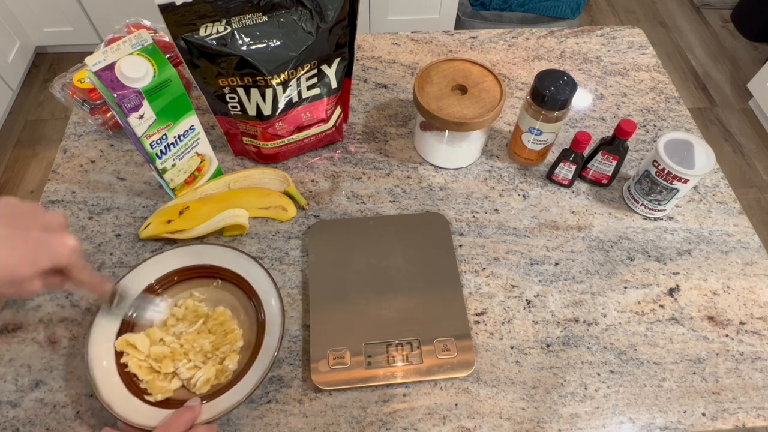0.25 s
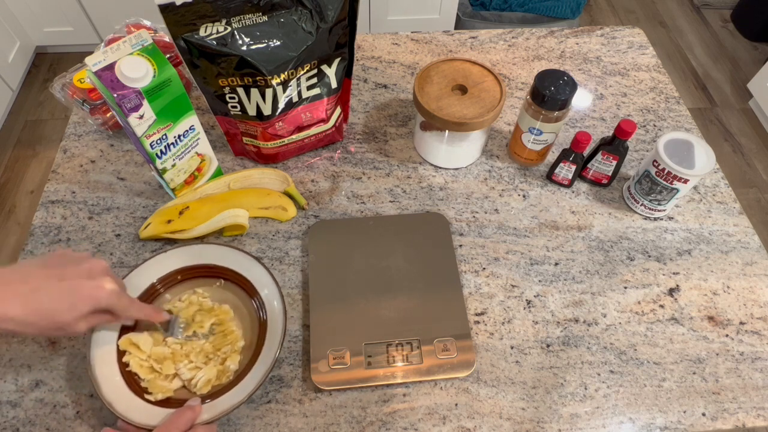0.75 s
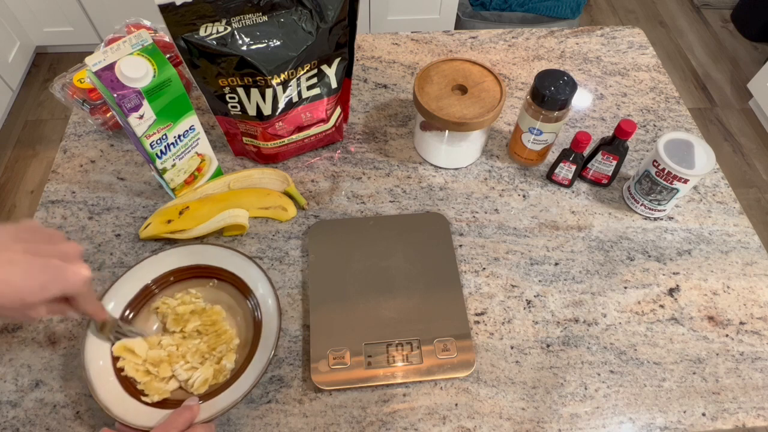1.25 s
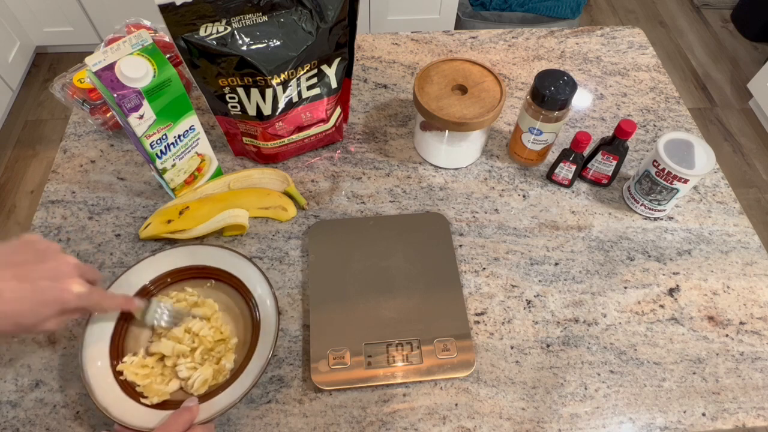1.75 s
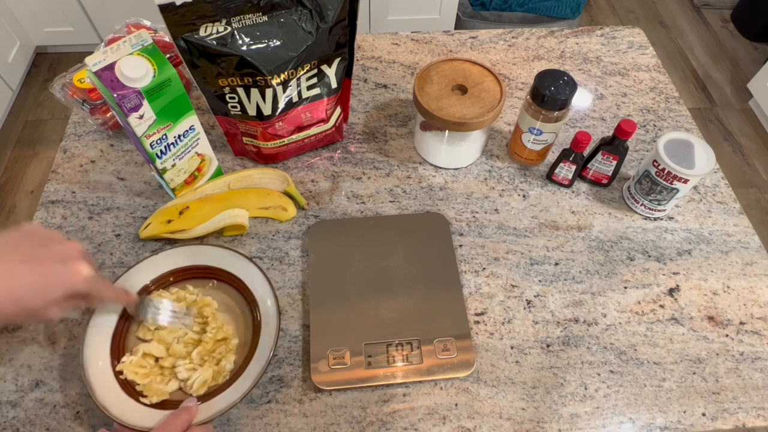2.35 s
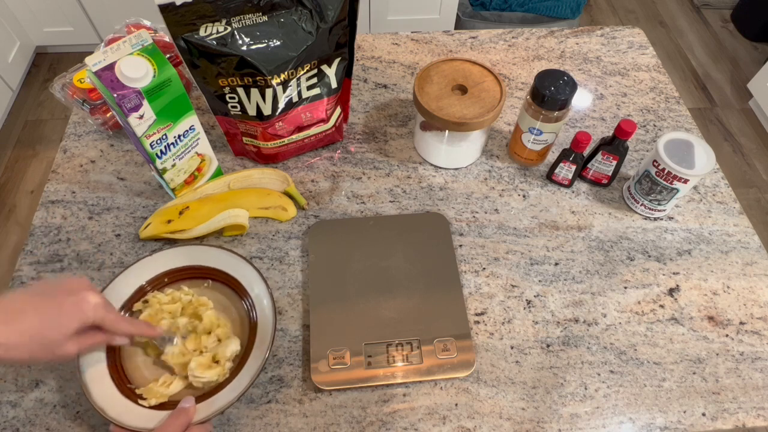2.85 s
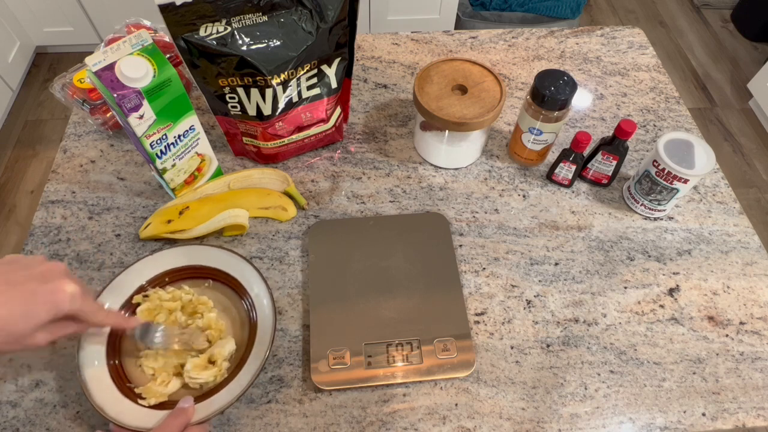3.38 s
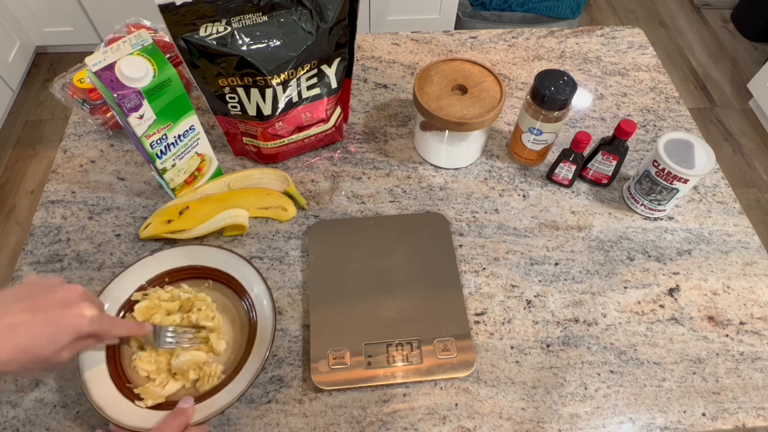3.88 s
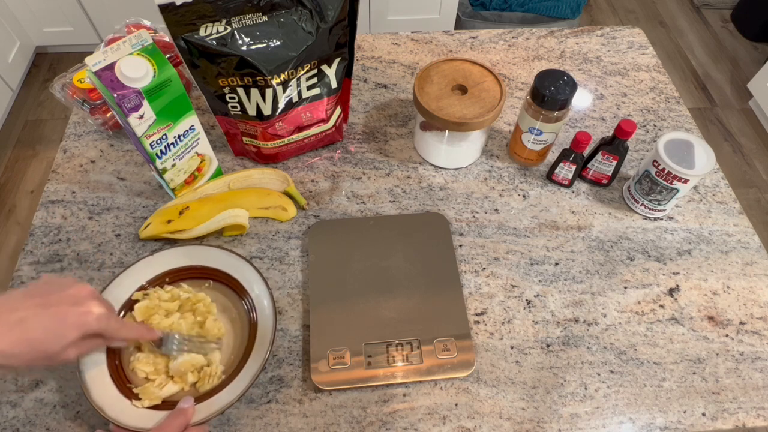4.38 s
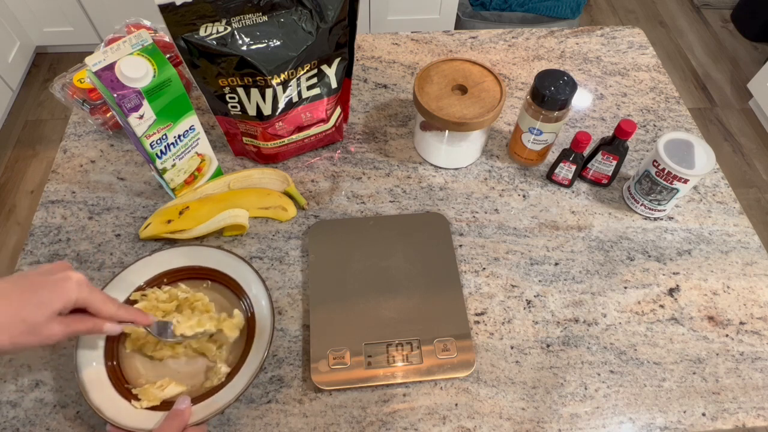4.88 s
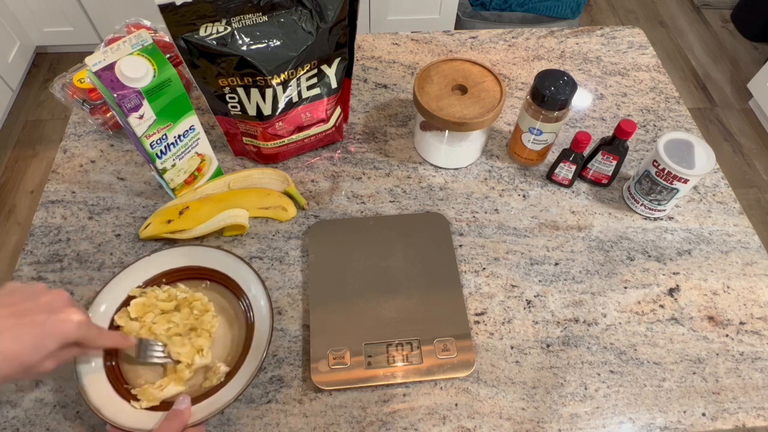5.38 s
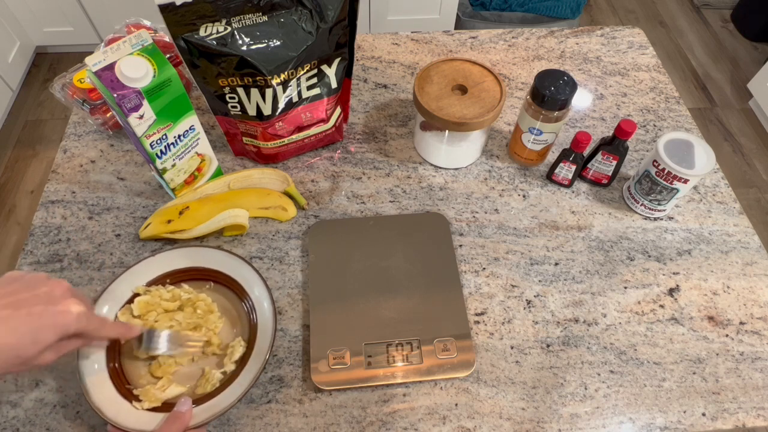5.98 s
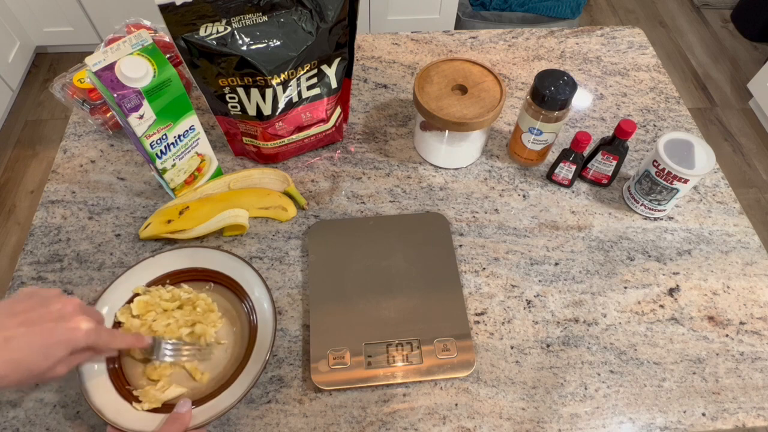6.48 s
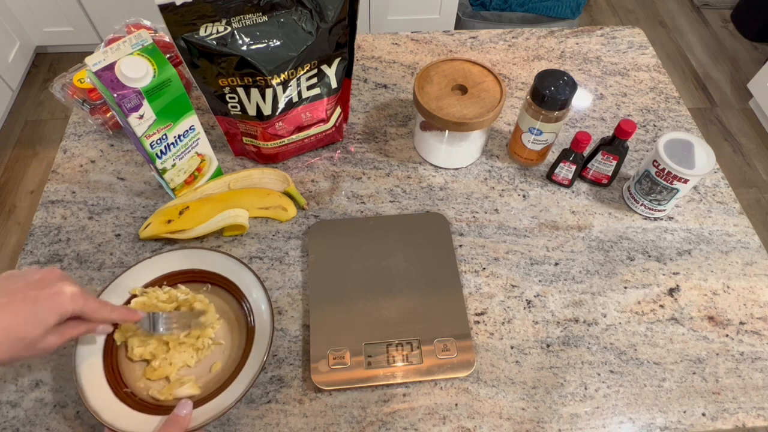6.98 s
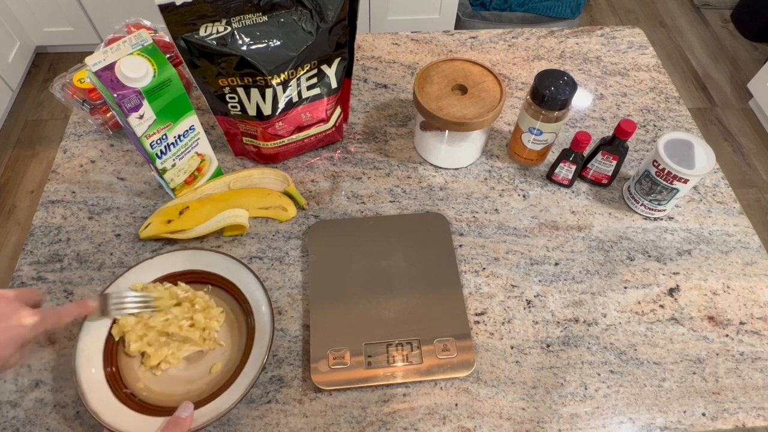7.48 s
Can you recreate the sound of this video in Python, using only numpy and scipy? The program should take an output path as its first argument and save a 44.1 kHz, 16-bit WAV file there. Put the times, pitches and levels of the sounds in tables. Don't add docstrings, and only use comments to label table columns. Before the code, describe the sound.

Tines tap and slip on glaze while soft fruit squelches and crackles in tiny moist clicks. The bowl thuds and rocks on stone, sparsely at first, with sharp hits at about 1.3 and 1.8 seconds, then more busily, peaking with a very loud knock around 6.3. Afterwards it thins out. Close stereo phone pickup, short kitchen reverberation, low faint refrigerator hum.

```python
import sys
import numpy as np
from scipy import signal
from scipy.fft import rfft, irfft
from scipy.io import wavfile
from scipy.ndimage import uniform_filter1d

SR = 44100
rng = np.random.default_rng(int(sys.argv[2]) if len(sys.argv) > 2 else 0)


def gain_from_db(level_db):
    decades = np.asarray(level_db, float) / 20
    return 10 ** decades


def materialize(psi):
    bounded = np.clip(np.atleast_2d(psi).T, -1, 1)
    quanta = np.round(bounded * 32767).astype(np.int16)
    wavfile.write(sys.argv[1], SR, quanta)


N = 341334

# mode_hz, level_db, t60_s
FORK_MODES = [(4948, -4.5, 0.04), (5170, -6.5, 0.016), (5900, -2.5, 0.026), (6500, -16, 0.025),
              (6500, 8.5, 0.0093), (7460, -9.5, 0.024), (8400, -2, 0.018), (8720, -5, 0.013),
              (10130, -8.5, 0.055), (10280, -8.5, 0.045), (11100, -1, 0.023), (13150, -5, 0.011),
              (12560, -14.5, 0.026), (12000, -8, 0.0057), (15400, -11, 0.021), (14160, -9.5, 0.0096)]
# mode_hz, level_db, t60_s
RIM_MODES = [(1080, -10, 0.072), (1420, -14, 0.1), (2043, -1.5, 0.059), (2287, -10, 0.047),
             (2460, -16.5, 0.025)]
# mode_hz, level_db, t60_s
HANDLE_MODES = [(3335, -4, 0.2), (3330, -21, 0.9)]
# mode_hz, level_db, t60_s
BOWL_MODES = [(614, -5, 0.071), (700.7, -12, 0.13), (720, -7.5, 0.022), (929.8, -2, 0.062),
              (1032.5, 2, 0.028), (1108.4, -1, 0.058), (1253, -4.5, 0.079), (1372, -7.5, 0.056),
              (1520, -2.5, 0.022), (1644, -5, 0.04), (1905, 0.5, 0.02), (2104, -13.5, 0.062),
              (2292, -3.5, 0.027), (2680, -11, 0.075), (2913, -20, 0.024), (3426, -19.5, 0.02)]
# greatest_force_s, tines_in_pulp_db, bowl_on_stone_db
PUSHES = [(0.0, -45.5, -55), (0.519, -50, -51), (0.9, -61, -54.5), (1.192, -46.5, -54), (1.5, -53, -51),
          (1.85, -61.5, -39), (2.15, -56.5, -52.5), (2.459, -91, -48), (2.78, -49, -30), (3.17, -48, -40.5),
          (3.43, -84, -43), (3.75, -52, -68), (4.01, -52, -47.5), (4.307, -48, -45.5), (4.571, -66, -63.5),
          (4.87, -37.5, -46), (5.22, -53, -38.5), (5.521, -58, -37), (5.8, -77.5, -43),
          (6.08, -67.5, -53.5), (6.409, -48.5, -23), (6.831, -63.5, -51), (7.45, -79, -48.5),
          (7.73, -71, -63)]


def evened(x):
    return x / np.sqrt(np.mean(x ** 2) + 1e-20)


def read(points, hz):
    f_hz, value = np.transpose(points)
    return np.interp(np.log(hz + 1), np.log(f_hz + 1), value)


def add(mix, start_s, sound):
    part = mix[round(start_s * SR):][:len(sound)]
    part += sound[:len(part)]


def ring(modes, chance, longer, tilt_db=0, spot_db=2.5, rise_s=0.00069, split=0.0035):
    hz, level_db, t60_s = np.array(modes, float).T[:, :, None]
    t = np.arange(12000) / SR
    decay_db = 60 * t / (t60_s * max(longer, 0.2))
    fade = gain_from_db(level_db + np.reshape(tilt_db, (-1, 1)) - decay_db) * (1 - np.exp(-t / rise_s))
    x = 0
    for luck in chance[:3 * len(modes)].reshape(3, -1, 1):
        detuned_hz = hz * (1 + split * luck[::-1])
        x = x + (fade * gain_from_db(spot_db * luck) * np.sin(2 * np.pi * detuned_hz * t + 3 * luck)).sum(0)
    return x / abs(x).max()


def crack(noise, fade_samples):
    u = np.arange(len(noise) - 1) / fade_samples
    return np.diff(noise) * np.exp(-u) * (1 - np.exp(-6 * u))


def squeak(slips, hz, width_hz):
    turn = np.exp(2j * np.pi * np.cumsum(hz * np.ones(len(slips))) / SR)
    r = np.exp(-np.pi * width_hz / SR)
    return evened((turn * signal.lfilter([1 - r], [1, -r], slips / turn)).real)


def fridge():
    # band_hz, density_db
    air_spectrum = [(41, -18.5), (70, -3.5), (145, -16.5), (174, -32), (256, -30.5), (286, -25), (360, -43),
                    (664, -52), (744, -64), (1930, -49), (11400, -73.5), (16000, -86.5)]
    air_db, hum_db, hum_hz, sway_hz = -48, -44.5, 55, 4
    shape = gain_from_db(read(air_spectrum, np.fft.rfftfreq(N, 1 / SR)))
    a, b = (evened(irfft(rfft(noise) * shape, N)) for noise in rng.standard_normal((2, N)))
    air = np.array([a + 0.1 * b, a - 0.19 * b]) * gain_from_db([[0.3], [-0.3]])
    sway = evened(uniform_filter1d(uniform_filter1d(rng.standard_normal(N), 4000), 4000))
    phase = 2 * np.pi * np.cumsum(hum_hz + sway_hz * sway) / SR
    hum = np.sqrt(2) * np.sin(phase) * (1 + 0.1 * sway[::-1])
    return gain_from_db(air_db) * air + gain_from_db(hum_db) * hum


def walls():
    # band_hz, t60_s
    decay = [(200, 0.45), (700, 0.37), (2000, 0.33), (5000, 0.39), (10000, 0.3), (16000, 0.2)]
    # delay_s, level_db
    echoes = [(.0021, -9), (.0046, -19.5), (.0075, -7.5), (.0118, -13.5), (.0163, -22.5), (.0224, -17.5)]
    # band_hz, likeness
    likeness = [(60, .98), (160, .95), (350, .7), (700, .1), (1200, .4), (2500, .5), (5000, .2),
                (9000, .93)]
    # band_hz, level_db
    colour = [(300, 2.4), (2000, -1.9), (6000, -2), (12000, -3)]
    taps = np.zeros((2, SR // 2))
    at = np.arange(200, SR // 2 - 20, 20) + rng.integers(0, 20, (2, (SR // 2 - 201) // 20))
    np.put_along_axis(taps, at, rng.choice([-1., 1.], at.shape), 1)
    hz, t, z = signal.stft(taps, SR, nperseg=256)
    same = np.clip(read(likeness, hz), 0, 1)[:, None]
    z[1] = same * z[0] + np.sqrt(1 - same ** 2) * z[1]
    fade_db = read(colour, hz)[:, None] - 60 * t / read(decay, hz)[:, None]
    tail = signal.istft(z * gain_from_db(fade_db), SR, nperseg=256)[1]
    tail *= gain_from_db(-0.5) / np.linalg.norm(tail, axis=1)[:, None]
    for k, (delay_s, level_db) in enumerate(echoes):
        skew = np.array([k % 2, 1 - k % 2]) * (k + 1)
        tail[[0, 1], round(delay_s * SR) + skew] += gain_from_db(level_db) * (-1) ** k
    return tail


def kitchen(x):
    turn = 2 * np.pi * 0.45 * np.arange(N) / SR
    shares = [np.sqrt(2 / 3) * abs(np.cos(turn + k * np.pi / 3)) for k in range(3)]
    return sum(signal.fftconvolve((x * share)[None], walls(), axes=1)[:, :N] for share in shares)


def ports(x):
    left_lag_samples = 0.88
    lag = np.exp(-2j * np.pi * np.fft.rfftfreq(N) * left_lag_samples)
    return np.array([irfft(rfft(x[0]) * lag, N), x[1]])


def pockets():
    # start_s, peak_db
    middling = [(0.0209, -28), (0.625, -24), (0.8754, -30.5), (0.9635, -35.5), (1.5202, -20),
                (1.5348, -21.5), (1.5465, -24), (1.7268, -25.5), (1.7361, -23.5), (2.045, -33),
                (2.076, -24), (2.3191, -23), (2.3542, -22), (2.8603, -21.5), (2.9861, -24.5), (3.018, -20),
                (3.3278, -23), (3.349, -18.5), (3.4191, -28.5), (3.9238, -29.5), (4.1775, -33),
                (4.301, -28.5), (4.4723, -24.5), (4.9185, -26), (4.9668, -32), (5.287, -30), (5.4067, -27),
                (6.9793, -24.5), (7.641, -28.5), (7.6553, -24.5)]
    # start_s, peak_db, centre_hz
    other_pockets = [(0.2163, -26, 8600), (0.2296, -22, 7500), (0.7691, -30.5, 12000), (0.8002, -23.5, 11000),
                     (1.5606, -19.5, 7780), (1.8773, -24.5, 8000), (1.9088, -27.5, 11870), (2.0623, -23, 10480),
                     (2.1883, -33, 10550), (2.4258, -29.5, 8550), (2.801, -21, 8360), (3.3223, -22, 11260),
                     (3.469, -23.5, 11100), (3.8258, -26.5, 11000), (4.217, -18.5, 9500), (4.949, -21, 8290),
                     (5.5635, -36, 8400), (5.584, -26, 7100), (5.683, -36, 10530), (6.0855, -32.5, 7460),
                     (6.1044, -33, 7360), (7.4828, -22, 8150), (0.7362, -40.5, 7850), (1.8273, -35, 8850),
                     (3.803, -35.5, 6900), (4.0918, -36, 9100), (4.6352, -35.5, 7480), (5.0114, -36.5, 11800),
                     (5.0746, -41, 11130),
                     (0.4463, -34.5, 5930), (0.609, -28, 5510), (0.6255, -42, 2140), (0.649, -33, 1900),
              (0.6656, -41, 1940), (0.804, -36, 2130), (0.8778, -39.5, 2140), (0.9283, -36, 4780),
              (1.1012, -10.5, 1910), (1.2635, -30.5, 4720), (1.4902, -18.5, 2190), (1.711, -28, 4490),
              (2.0753, -31, 1420), (2.1085, -30.5, 4070), (3.0998, -34, 5890), (3.1785, -33.5, 5870),
              (3.491, -30, 4450), (3.63, -25, 4650), (3.9531, -29, 4160), (4.0499, -31, 5140),
              (4.122, -34.5, 5980), (4.6009, -36, 4670), (5.0989, -29, 5190), (5.7871, -26, 5430),
              (5.8546, -32, 6030), (5.9964, -34.5, 5920), (6.678, -45, 4850), (6.9601, -24, 5440),
                     (0.595, -29.5, 9800), (0.6494, -33.5, 5980), (0.8194, -42, 6350), (0.9394, -42, 7270),
             (0.9704, -42, 6050), (0.9911, -38, 6700), (1.0054, -44.5, 6240), (2.2144, -37.5, 4540),
             (2.8084, -30, 6660), (2.8644, -26.5, 6490), (3.3544, -27, 4930), (3.7094, -35, 5860),
             (3.7868, -40.5, 4410), (3.9055, -36, 11300), (3.9344, -30.5, 6240), (4.9287, -22.5, 6600),
             (5.0858, -39.5, 8160), (5.3283, -45.5, 7770), (5.5732, -36.5, 6990), (5.5977, -29.5, 7600),
             (7.4944, -34.5, 4980), (7.6854, -41, 6620), (7.7214, -39, 8160), (7.7334, -38.5, 9000),
             (.4354, -38, 6950), (.7774, -36, 11000), (1.086, -31, 7000), (1.093, -33.5, 6000),
             (1.7034, -35, 4970), (1.7414, -39, 3920), (1.753, -28, 3500), (1.8515, -36, 6000),
             (2.78, -35, 4186), (3.4754, -37.5, 11000), (3.6144, -41.5, 9000), (3.44, -39, 10500),
             (3.75, -36, 10000), (5.375, -50, 10900), (5.958, -37, 12000)]
    middling_hz = 6156
    return [(s, db, middling_hz) for s, db in middling] + other_pockets


def pop(hz, cycles):
    u = np.arange(200) / SR * min(hz, 16000)
    return np.sin(2 * np.pi * u * (1 + 0.034 * u)) * u / cycles * np.exp(1 - u / cycles)


def pushing(levels_db):
    rise_db_per_s, fall_db_per_s = 125.5, 152.5
    late_s = np.arange(0, N + 64, 64) / SR - np.transpose(PUSHES)[0][:, None]
    slope_db = np.where(late_s < 0, rise_db_per_s, -fall_db_per_s) * late_s
    return np.repeat(gain_from_db(levels_db[:, None] + slope_db).sum(0), 64)[:N]


def stickiness():
    out, t = np.zeros(N), np.arange(-0.012, 0.1, 1 / SR)
    shape = np.where(t < 0, np.exp(t / 0.004), np.exp(-t / 0.035))
    for start_s, peak_db, hz in pockets():
        add(out, max(start_s + t[0], 0), gain_from_db(peak_db - 36.0) * (hz > 3000) * shape)
    return out


def drag():
    _, wet_db, slide_db = np.transpose(PUSHES)
    bubbles_per_s = 4000
    size = gain_from_db(5 * np.minimum(rng.exponential(1, N), 4)) * (rng.random(N) < bubbles_per_s / SR)
    kind = rng.integers(0, 12, N)
    fizz = np.zeros(N)
    for k, hz in enumerate(np.geomspace(3000, 15500, 12)):
        fizz += signal.oaconvolve(size * (kind == k), pop(hz, 0.94))[:N]
    bowl = ring(BOWL_MODES, rng.standard_normal(50), 0.49)
    grit = signal.oaconvolve(rng.standard_normal(N), bowl)[:N]
    wet = evened(fizz) * (pushing(wet_db - 17.0) + stickiness())
    return wet + evened(grit) * pushing(slide_db - 8.5)


def pops():
    out, rows = np.zeros(N), pockets()
    for (start_s, peak_db, hz), c in zip(rows, rng.random((len(rows), 260))):
        snap = pop(hz, 0.65 + 0.94 * c[0])
        snap += 0.5 * pop(hz * (2.154 + 0.2 * c[1]), 2.2)
        snap += hz / 6000 * 2.3 * crack(c[59:], 45)
        add(out, start_s, gain_from_db(peak_db) * snap / abs(snap).max())
    return out


def thump(noise, centre_hz):
    t = np.arange(len(noise)) / SR
    band = signal.butter(1, [0.7 * centre_hz, 0.72 * centre_hz], "band", fs=SR)
    x = signal.lfilter(*band, noise) * gain_from_db(-60 * t / 0.034)
    return x / abs(x).max()


def knocks():
    # start_s, peak_db, centre_hz, ring_factor, weight_db
    blows = [(0.19, -20, 1080, 0.9, 2.5), (0.399, -31.5, 815, 1.5, 1), (0.48, -25.5, 837, 0.14, 4.5),
             (1.345, -10, 1220, 0.89, -2), (1.761, -3, 1172, 0.54, -5.5), (2.273, -29, 840, 0.47, -1.5),
             (2.448, -21.5, 915, 1.25, -3), (2.719, -4, 1220, 0.82, 0.5), (3.119, -17.5, 924, 1.65, -7),
             (3.43, -25, 875, 0.73, -2.5), (3.677, -25, 1000, 0.44, 3), (4.055, -22, 662, 0.6, -5),
             (4.506, -15.5, 985, 1.16, 2), (4.564, -17.5, 826, 0.49, 0.5), (4.838, -13, 1220, 0.74, 1),
             (5.134, -18.5, 1010, 1.2, 0.5), (5.208, -14, 1090, 0.61, -3), (5.448, -23.5, 910, 0.79, -1.5),
             (5.51, -17, 1025, 0.88, -0.5), (5.719, -14.5, 970, 1.17, -3.5), (5.769, -23.5, 674, 1.05, -2),
             (6.03, -3.5, 1140, 0.3, -8), (6.056, -7, 1080, 1.35, -8.5), (6.256, -19.5, 900, 0.52, -4.5),
             (6.335, 6, 1385, 1.42, 3), (6.555, -12, 950, 0.77, -2), (6.609, -16.5, 890, 1.26, -3.5),
             (6.883, -25.5, 530, 0.92, 3)]
    # start_s, peak_db, weight_db
    rocks = [(0.002, -55.5, 11), (0.885, -45, -1), (0.982, -42, 3.5), (1.063, -33.5, 4.5),
             (1.191, -47.5, 3.5), (1.287, -47, 2), (1.473, -30.5, -5.5), (1.975, -37.5, -6),
             (2.134, -39.5, 4), (2.191, -31, 1.5), (2.318, -38, -5.5), (2.563, -43.5, 2.5),
             (3.011, -38.5, -4.5), (3.638, -27, -1), (3.982, -37.5, 1), (4.213, -40, -6), (4.492, -25.5, 4),
             (4.768, -22.5, 1.5), (5.977, -25, 0), (6.808, -30, 6), (7.327, -42.5, -2), (7.37, -42.5, -12),
             (7.424, -40, -1.5), (7.665, -40, 8)]
    # start_s, peak_db, ring_factor
    stone_cracks = [
        (1.7606, -18, .12),
        (2.719, -25, .2),
        (6.0264, -23, .15),
        (6.0521, -33, .15),
        (6.335, -0.5, .3),
    ]
    # mode_hz, level_db, t60_s
    slab_modes = [(71.3, -11.5, 0.38), (190, -7.5, 0.13), (272.4, -3, 0.063), (348.4, -6, 0.16),
                  (469.4, -4.5, 0.1)]
    # mode_hz, level_db, t60_s
    foot_modes = [(4450, -6.5, 0.015), (5440, -10, .012), (3500, -10, 0.037), (6240, -1, 0.025),
                  (7050, -9, 0.035), (7500, -4, 0.011), (9620, -2.5, 0.012)]
    rock_hz, rock_ring = 950, 1.82
    thud_db, thud_growth = -23, 0.67
    out, hz = np.zeros(N), np.transpose(BOWL_MODES)[0]
    blows = blows + [(s, db, rock_hz, rock_ring, weight_db) for s, db, weight_db in rocks]
    chances = rng.standard_normal((len(blows), 2100))
    for (start_s, peak_db, centre_hz, longer, weight_db), c in zip(blows, chances):
        tilt_db = -5 * np.log2(hz / centre_hz) ** 2
        tilt_db += weight_db * np.maximum(np.log2(centre_hz / hz), 0)
        bowl = ring(BOWL_MODES, c, longer, tilt_db, spot_db=2.0, rise_s=0.00026, split=0.0076)
        dull = crack(np.cumsum(c[99:700]), 110)
        bowl[:600] += 0.16 * uniform_filter1d(dull, size=7)
        bowl[:2000] += 0.35 * thump(c[100:], centre_hz)
        slab = ring(slab_modes, c[50:], longer, spot_db=2.0, rise_s=0.00071, split=0.046)
        slab_db = weight_db + thud_db + (thud_growth - 1) * peak_db
        add(out, start_s, gain_from_db(peak_db) * (bowl + gain_from_db(slab_db) * slab))
    chances = rng.standard_normal((len(stone_cracks), 900))
    for (start_s, peak_db, longer), c in zip(stone_cracks, chances):
        add(out, start_s, gain_from_db(peak_db - 3.5) * ring(foot_modes, c, 2 * longer, split=0.02))
        add(out, start_s, gain_from_db(peak_db - 23.0) * crack(c[99:], 190))
    return out


def scrapes():
    # time_s, level_db, rim_squeak_hz
    strokes = [
        [(2.61, -10, 1670), (2.63, -24.5, 1537), (2.665, -19.5, 1400), (2.712, -42, 1330), (2.72, -39, 1306)],
        [(6.25, -31, 1940), (6.256, -26, 1930), (6.326, -59, 1960), (6.33, -44.5, 1920)],
        [(6.53, -30.5, 1750), (6.542, -41, 1710), (6.58, -32, 1490), (6.592, -30, 1460), (6.66, -80, 1350)],
        [(7.33, -26.5, 2010), (7.334, -20.5, 2076), (7.4, -35, 1974), (7.45, -43.5, 1526), (7.5, -50, 1520)],
    ]
    handle_shares = [0.16, .1, .1, 0.022]
    tine_hz, handle_hz, rim_hz = 6330, HANDLE_MODES[0][0], RIM_MODES[2][0]
    out = np.zeros(N)
    for rows, handle_share in zip(strokes, handle_shares):
        s, level_db, squeak_hz = np.transpose(rows)
        t = np.arange(s[0], s[-1], 1 / SR)
        c = rng.standard_normal(80)
        slips = rng.standard_normal(len(t)) * rng.exponential(1, len(t))
        both = evened(signal.fftconvolve(slips, ring(FORK_MODES, c, 0.3, split=0.0042))[:len(t)])
        both += 0.6 * squeak(slips, tine_hz, 250)
        both += 0.44 * squeak(slips, np.interp(t, s, squeak_hz), 20)
        both += handle_share * squeak(slips, handle_hz, 11)
        both += 0.27 * squeak(slips, rim_hz, 40)
        level = gain_from_db(np.interp(t, s, level_db) - 15.0)
        add(out, s[0], level * both * signal.windows.tukey(len(t), 0.3))
    return out


def squeals():
    # start_s, peak_db, pitch_hz, length_s
    catches = [
        (2.651, -17, 6330, .014),
        (2.668, -18.5, 6350, 0.0085),
        (2.684, -29, 7400, .014),
        (2.62, -29, 4900, 0.014),
        (2.622, -29.5, 7100, .012),
        (6.556, -26.5, 6450, .03),
        (6.258, -25.5, 6450, 0.022),
        (7.355, -39, 5900, 0.027),
    ]
    out = np.zeros(N)
    for start_s, peak_db, hz, length_s in catches:
        n = round(length_s * SR)
        drive = 1.5 * np.cos(2 * np.pi * hz * np.arange(n) / SR) + rng.standard_normal(n)
        add(out, start_s, gain_from_db(peak_db - 7.5) * np.hanning(n) * squeak(drive, hz, 300))
    return out


def clinks():
    # start_s, peak_db, rim_re_peak_db, brightness_db, ring_factor
    strikes = [(0.1115, -9.5, -25.5, 0.5, 0.74), (0.4586, -19.5, -26.5, -17, 0.8),
               (1.1003, -14.5, -26, 6, 0.61), (1.3449, 7.5, -28, -3.5, 0.4), (2.6115, -24, -18, 2, 0.78),
               (2.6259, -16.5, -26, 17, 0.8), (3.6456, -20, -29, -10, 0.38),
               (4.2032, -23, -24.5, 5.5, 0.26), (4.4893, -19, -31, -5, 0.44), (4.7641, -11, -30, -13.5, 1),
               (5.1211, -26, -18, -16, 0.44), (5.4282, -20.5, -23, -12.5, 0.28),
               (5.6959, -13, -25.5, 3.5, 0.38), (5.9721, -11, -26, 0, 0.61),
               (6.2488, -10.5, -24.5, -4, 0.45), (6.5279, -11, -22, -17.5, 0.75),
               (6.8057, -7, -29.5, 8.5, 0.43), (7.3261, -17, -26, -11, 0.88)]
    handle_db, handle_growth = -44, 1.0
    out, hz = np.zeros(N), np.transpose(FORK_MODES)[0]
    chances = rng.standard_normal((len(strikes), 4100))
    for (start_s, peak_db, low_db, bright_db, longer), c in zip(strikes, chances):
        tilt_db = (bright_db + 9.5) * 0.48 * np.log2(hz / 8000)
        steel = ring(FORK_MODES, c, 0.62 * longer, tilt_db, spot_db=1.2, split=0.009)
        steel[:800] += 0.27 * crack(c[99:900], 190 * longer)
        steel[:4000] += 0.035 * crack(c[99:], 900 * longer + 200)
        steel[:60] += 0.32 * crack(c[:61], 3.2)
        rim = gain_from_db(low_db + 10) * ring(RIM_MODES, c[60:], longer, rise_s=0.0026, split=0.0088)
        handle = gain_from_db(handle_db + handle_growth * peak_db) * ring(HANDLE_MODES, c[80:], 0.71, split=0)
        add(out, start_s, gain_from_db(peak_db) * (steel + rim + handle))
    return out


def scene():
    hard = clinks() + knocks() + scrapes()
    sung = squeals()
    wet = pops() + drag()
    direct = gain_from_db(2.0) * (hard + wet + sung)
    room = kitchen(hard + gain_from_db(-6.0) * wet + gain_from_db(-9.0) * sung)
    return ports(direct + room) + fridge()


def band_limit(x):
    return signal.sosfilt(signal.butter(12, 16050, fs=SR, output="sos"), x)


def record(dry):
    x = signal.lfilter(*signal.butter(1, 16000, fs=SR), dry)
    x = signal.lfilter(*signal.butter(8, 15700, fs=SR), x)
    x = signal.lfilter(*signal.butter(2, 38, "high", fs=SR), x)
    return band_limit(np.clip(x, -1, 1))


dry = scene()
out = record(dry)
materialize(out)
```